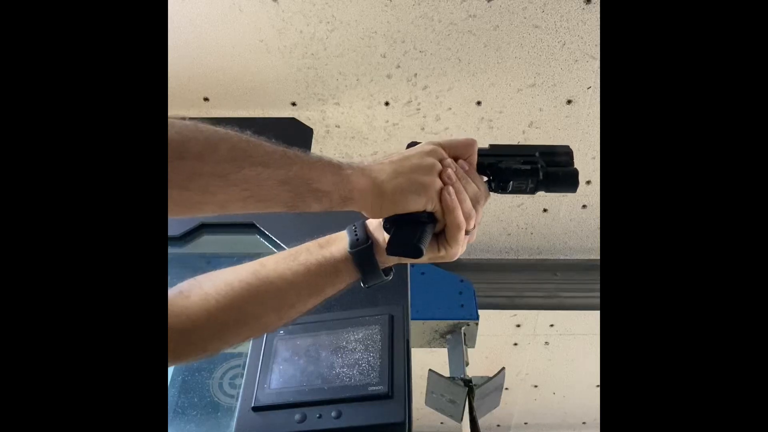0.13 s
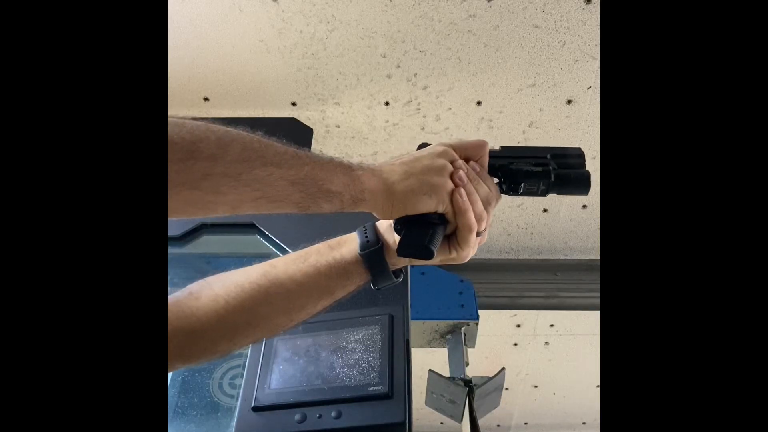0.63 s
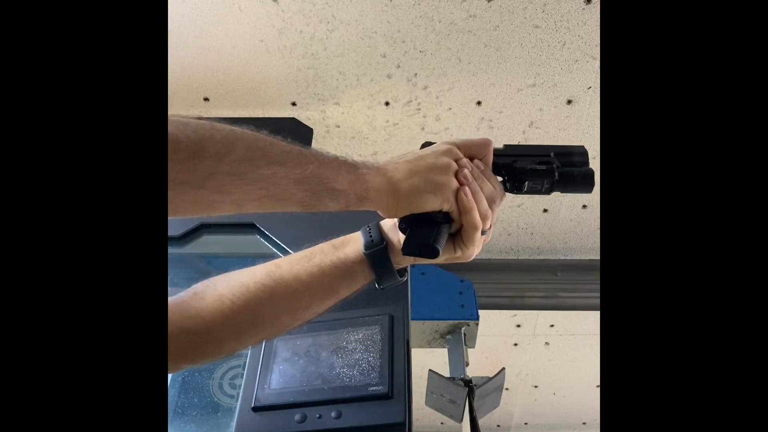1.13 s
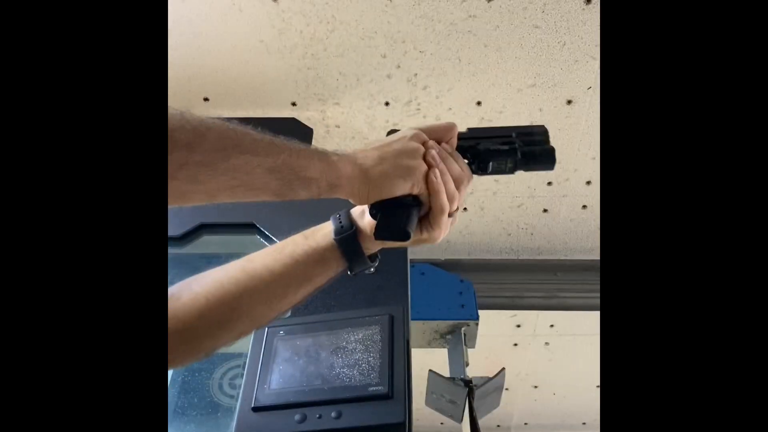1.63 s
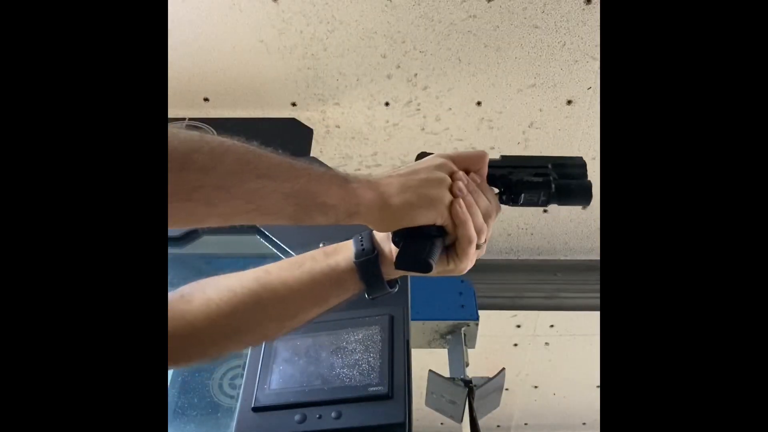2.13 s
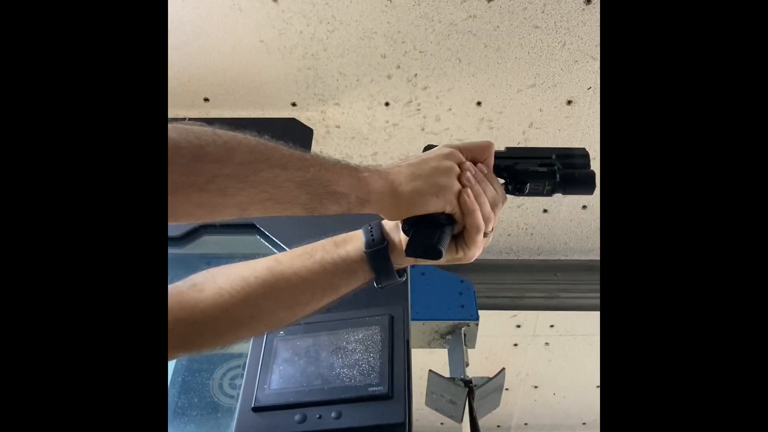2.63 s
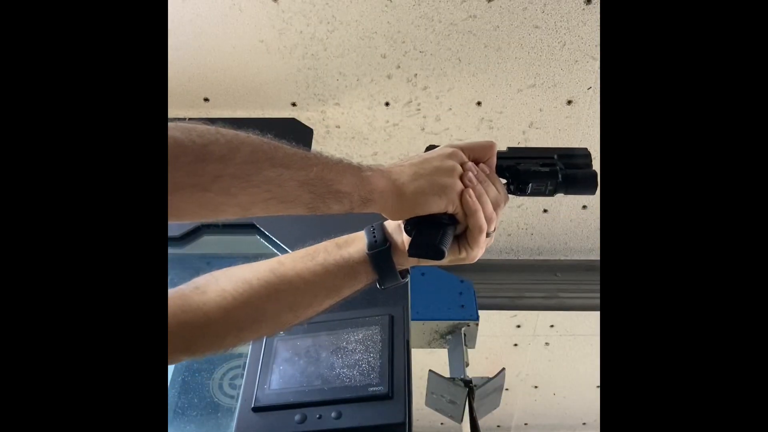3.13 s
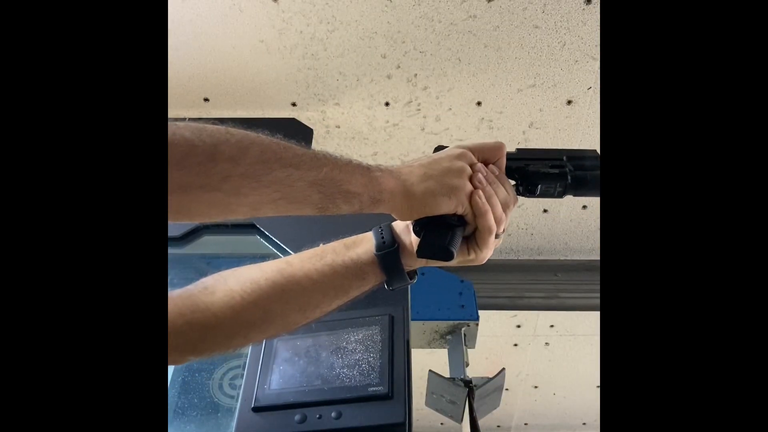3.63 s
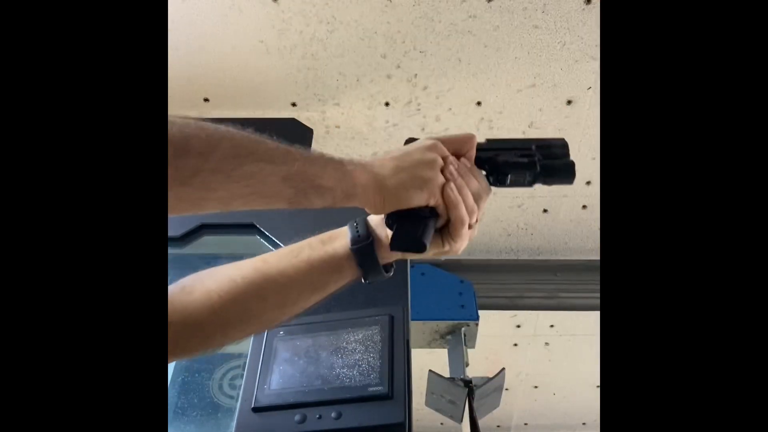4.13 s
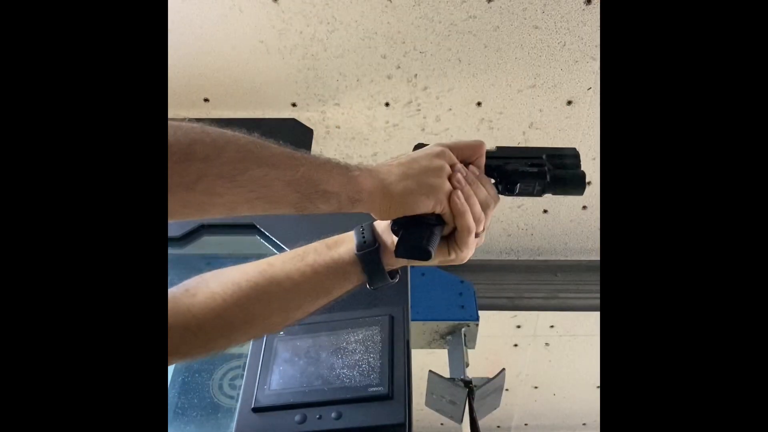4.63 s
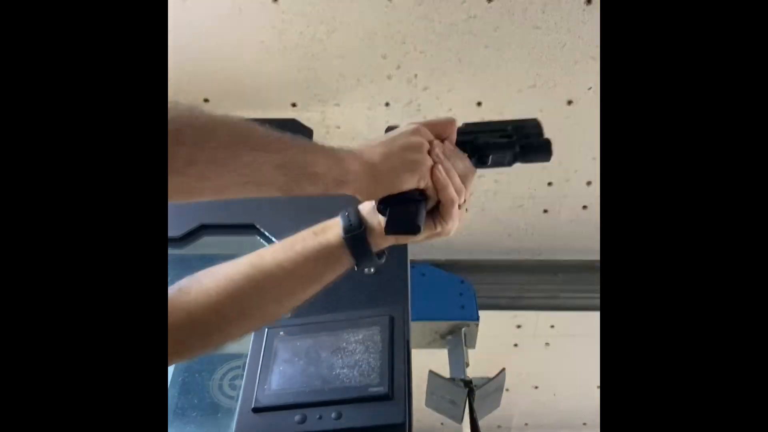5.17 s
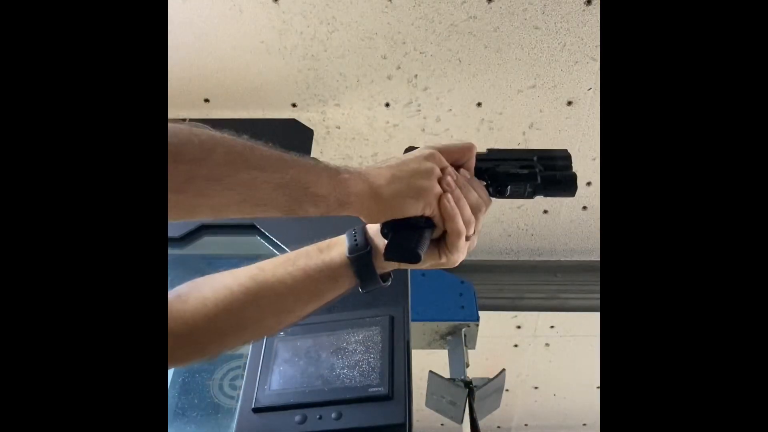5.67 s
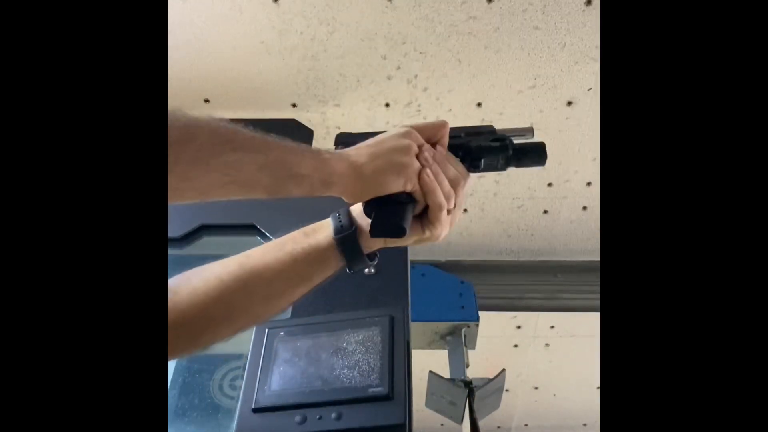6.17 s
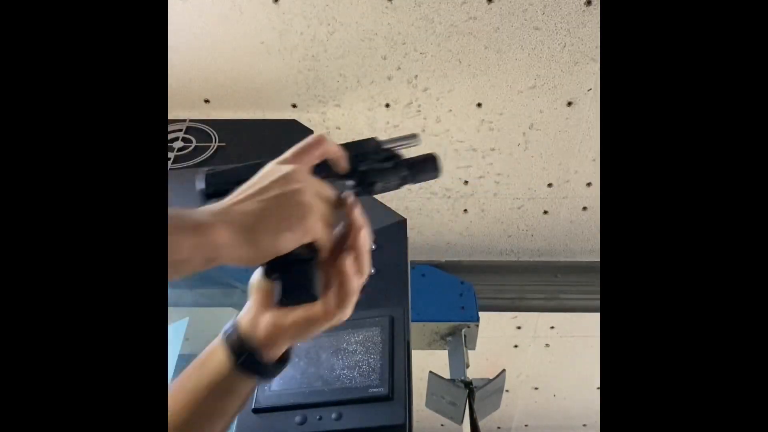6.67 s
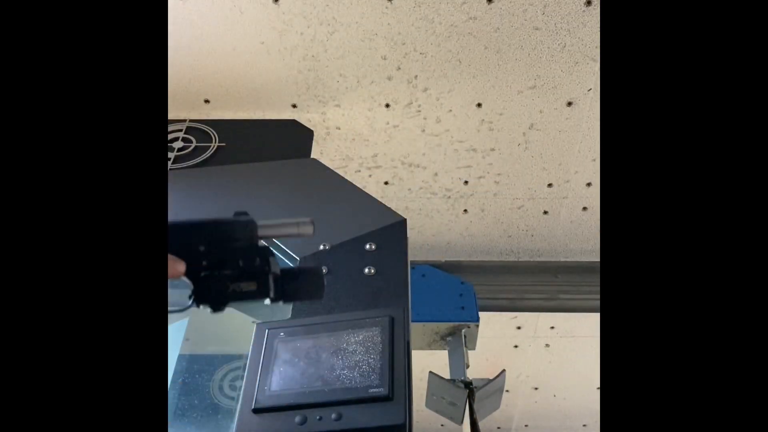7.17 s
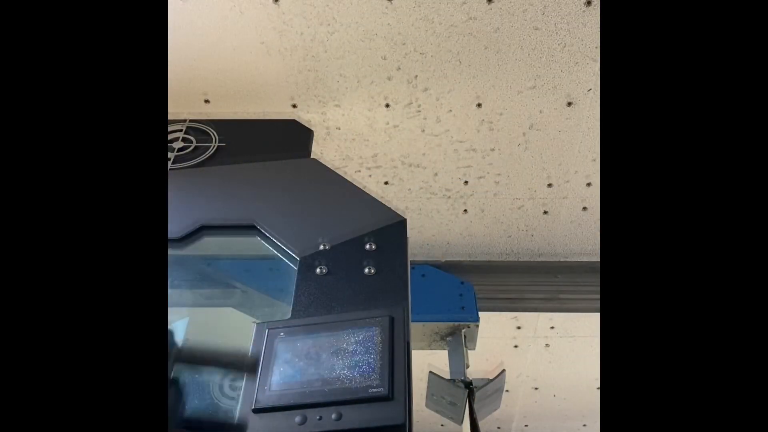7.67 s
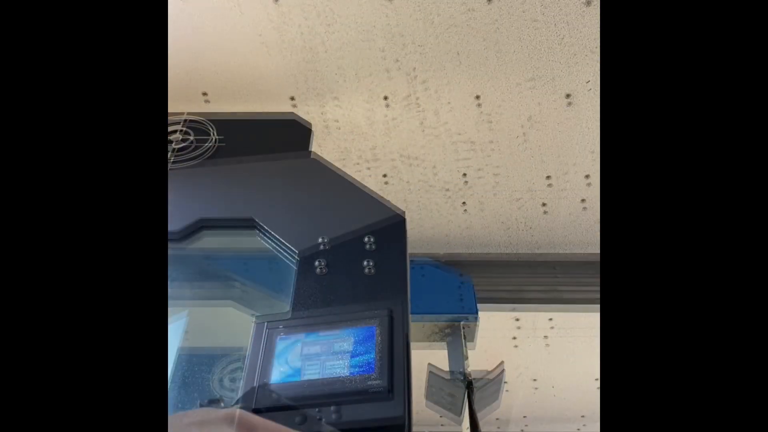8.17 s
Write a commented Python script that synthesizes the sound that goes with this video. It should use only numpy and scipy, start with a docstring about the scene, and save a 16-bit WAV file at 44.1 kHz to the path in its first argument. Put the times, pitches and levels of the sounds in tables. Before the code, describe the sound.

Indoor shooting range, heard close in stereo from inside a booth. Brass tinkles first over soft bass-heavy air noise. Four very loud pistol shots follow, separated by one long gap and two shorter ones, each a sharp crack with a dense booth burst, far-wall returns and a long dark tail. Cases ping between them. Dull neighbouring shots swell through the wall near the second blast and after the last, alongside gun-handling clicks.

```python
"""Ventilation rumbles while a brass case bounces on the floor; then a pistol fires four times close by.
The place is a booth of a long, hard-walled indoor range, heard through a two-port microphone.
Each blast is a short pulse with reflections; shaped noise fills the booth and returns down the hall.
A neighbour fires three times behind a wall: dull noise, a panel rattle and a late swell.
Cases and small sounds such as gun handling are noise and clicks that set metal resonances ringing."""
import sys
import numpy as np
from scipy import signal
from scipy.fft import rfft, irfft, next_fast_len
from scipy.io import wavfile
from scipy.ndimage import map_coordinates

SR = 44100
rng = np.random.default_rng(int(sys.argv[2]) if len(sys.argv) > 2 else 0)


def generate_wav(signal):
    """Clip the signal to [-1, 1] and save it as 16-bit WAV at the path in sys.argv[1]."""
    frames = np.transpose(np.atleast_2d(signal))
    scaled = np.clip(frames, -1, 1) * 32767
    pcm = np.round(scaled).astype(np.int16)
    wavfile.write(sys.argv[1], SR, pcm)


def ratio(d):
    """dB to gain"""
    e = np.asarray(d, float) / 20
    return 10 ** e


N = 365588

PORTS_DIFFER_HZ = 500   # around here the two microphone ports begin to hear different sound
# Reverberation of the long hall by pitch: f/Hz, build-up/s, t60/s
HALL_TIMES = [(49, 0.14, 2.3), (254, 0.02, 1.57), (600, 0.0092, 1.434), (1440, 0.042, 1.21),
              (2980, 0.0082, 1.16), (6000, 0.0055, 0.84), (10840, .005, 0.31)]


def at_hz(points, hz, axis=1):
    """Reads a column of a table on a log-frequency axis."""
    table = np.array(points)
    return np.interp(np.log(hz), np.log(table[:, 0]), table[:, axis])


def bands(size):
    """Third-octave bands of stereo noise, flat per Hz; the ports differ more as the wave gets shorter."""
    edges = 22 * 2 ** (np.arange(30) / 3)
    settle = 4000   # samples dropped while the filters settle
    white = rng.standard_normal((2, 2, size + settle))
    for k, (low, high) in enumerate(zip(edges, edges[1:])):
        sos = signal.butter(2, [low, high], "band", fs=SR, output="sos")
        mid, side = signal.sosfilt(sos, white[k % 2])[:, settle:]
        hz = np.sqrt(low * high)
        yield hz, mid + side * [[1], [-1]] * hz / np.hypot(hz, PORTS_DIFFER_HZ)


def level(spectrum, db):
    """dB-per-Hz table as a gain by pitch, scaled so that the whole spectrum has the given rms."""
    hz = np.arange(20., SR / 2, 5.)
    total = np.mean(ratio(at_hz(spectrum, hz)) ** 2 * (hz < spectrum[-1][0]))
    return lambda f: ratio(db + at_hz(spectrum, f)) / np.sqrt(total)


def swell(t, rise, t60):
    """Builds up from t = 0 while decaying at 60 dB per t60."""
    t = np.maximum(t, 0)
    build_up = 1 - np.exp(-np.minimum(t / max(rise, 1e-4), 40))
    return build_up * np.exp(-np.minimum(np.log(1000) * t / t60, 40))


def ring(clicks, hz, t60):
    """A damped resonance: a unit click starts a sine of height 1."""
    r, w = ratio(-60 / (t60 * SR)), 2 * np.pi * hz / SR
    return signal.lfilter([0, np.sin(w)], [1, -2 * r * np.cos(w), r * r], clicks + 1e-18)


def add(out, s, x):
    """Mixes x into out from time s on."""
    i = round(s * SR)
    out[..., i:i + x.shape[-1]] += x[..., :out.shape[-1] - i]


def ventilation():
    """Steady air noise throughout, strongest in the bass."""
    # Air noise spectrum: f/Hz, level/dB per Hz
    air_spectrum = [(13, -37), (22, -17), (38, -5.5), (70, 0.5), (103, -7), (250, -16), (600, -17),
                    (950, -19), (1300, -23), (2550, -27), (4880, -34), (9850, -45), (12500, -48.5),
                    (16000, -54.5)]
    air = level(air_spectrum, -63.5)
    return sum(air(hz) * noise for hz, noise in bands(N))


def cases():
    """Each bounce: a few ms of rough contact, a hollow knock, and the brass tube left ringing."""
    # Bounces on the floor: t/s, skid level/dB, knock f/Hz, knock level/dB, ring level/dB
    bounces = [(.002, -57.5, 3630, -54, -68), (.0628, -43.5, 3710, -27.5, -61),
               (.0854, -51.5, 3740, -38, -70), (.0942, -46.5, 3580, -34, -63), (.1221, -59, 3680, -40, -69),
               (.1374, -73, 3700, -47, -64), (.176, -54.5, 2040, -38, -70), (.2109, -59, 3570, -44.5, -74),
               (.2808, -41.5, 3630, -26.5, -65), (.3456, -61.5, 2090, -43, -81),
               (.3586, -57.5, 3670, -40.5, -75), (.4923, -61, 2300, -52, -83),
               (.5412, -69.5, 1970, -57, -87), (1.9114, -49, 3700, -70, -64.5),
               (2.1644, -58, 4520, -63.5, -85.5), (2.5336, -61.5, 4400, -53, -76.5),
               (2.8669, -71.5, 4150, -59, -78), (4.3899, -35.5, 3630, -26, -50.5),
               (4.4274, -49.5, 3720, -56, -66), (4.8843, -77, 2780, -51, -77),
               (5.6854, -44.5, 3760, -50, -72), (5.7034, -28.5, 2530, -34, -63),
               (7.3794, -72, 3750, -66, -67.5), (7.5894, -70, 3700, -70, -69.5)]
    # Partials of the knock: share of the knock's f, level/dB, t60/s
    knock = [(.35, -25, .015), (.6, -20, .008), (.82, -14, .022), (.97, -6, .01), (1., 0, .02),
             (1.13, -9, .008), (1.3, -12, .01)]
    # Ringing of the bouncing case: f/Hz, level/dB, t60/s
    brass_ring = [(7885, 0, .38), (7930, -3, .3), (9400, -16, .1), (12220, -9, .25)]
    skid_t60_s, skid_brightness = 0.035, 0.51   # brightness: 0 = full-bodied, 1 = treble only
    grit_share, grit_t60_s = 0.5, 0.03   # push of the rough contact beside the firm one
    left_db = 3.5   # tilt towards the left port
    out, t = np.zeros((2, N)), np.arange(SR // 2) / SR
    tilt = ratio(np.array([[left_db], [-left_db]]) / 2)
    grit = rng.standard_normal((len(bounces), 2, SR // 10))
    for (s, skid_db, hz, db, ring_db), noise in zip(bounces, grit):
        padded = np.pad(noise, ((0, 0), (0, len(t) - SR // 10)))
        skid = padded * swell(t, 0.00088, skid_t60_s)
        rough = skid * swell(t, .002, grit_t60_s)
        # one firm contact amid the grit
        push = signal.unit_impulse(len(t), 60) + grit_share * rough / np.sqrt(np.sum(rough ** 2) / 2)
        bounce = ratio(skid_db) * signal.lfilter([1, -skid_brightness], 1, skid)
        for k, (share, d, t60) in enumerate(knock):
            bounce += (-1) ** k * ratio(db + d) * ring(push, share * hz, t60)
        for f, d, t60 in brass_ring:
            bounce += ratio(ring_db + d) * ring(push, f, t60)
        add(out, s, bounce * tilt)
    return out


def small_sounds():
    """Short noise bursts around a broad resonance, each of which sets steel resonances ringing."""
    # Gun handling, dull bodies of case knocks, a low blip, the onset of a neighbour's shot:
    # t/s, level/dB, centre f/Hz, t60/s
    bursts = [(.179, -44, 600, 0.081), (0.213, -51.5, 600, 0.25), (0.62, -44.5, 9000, 0.027),
              (2.882, -48.5, 650, 0.061), (3.590, -48, 7980, 0.047), (6.645, -59, 6000, 0.18),
              (6.648, -43, 1800, 0.08), (6.912, -49.5, 3550, 0.11), (7.014, -49, 8000, 0.074),
              (7.034, -50.5, 5060, 0.168), (7.101, -49, 2700, 0.06), (7.139, -59, 3800, 0.1),
              (3.439, -57, 390, 0.43)]
    # Steel resonances: f/Hz, level/dB, t60/s
    steel = [(1940, 2, .05), (2700, -2.5, 0.037), (3770, -3, 0.058), (5060, 3, .08), (5260, -8, .08),
             (10300, -8, .05)]
    steel_db, rise_s = 9, 0.0017   # steel_db is added to every resonance
    out, t = np.zeros((2, N)), np.arange(SR // 5) / SR
    noises = rng.standard_normal((len(bursts), 2, len(t)))
    for (s, db, hz, t60), noise in zip(bursts, noises):
        sos = signal.butter(2, [hz / 2.4, min(hz * 1.51, .45 * SR)], "band", fs=SR, output="sos")
        # the root evens out the loudness of narrow and wide bands
        burst = signal.sosfilt(sos, noise) * swell(t, rise_s, t60) * np.sqrt(SR / 4 / hz)
        ringing = 0
        for f, d, ring_t60 in steel:
            per_sample = 2 * np.log(1000) / (ring_t60 * SR)   # offsets the gain of a long ring
            ringing = ringing + ratio(steel_db + d) * per_sample * ring(burst, f, ring_t60)
        add(out, s, ratio(db) * (burst + ringing))
    return out


def blast(ms):
    """Pressure pulse: two strong opposite swings, with a faint one at each end; ms is one full wave."""
    phase = np.linspace(0, 1, int(1.5 * ms * SR / 1000))
    return np.sin(3 * np.pi * phase + np.pi / 2) * np.sin(np.pi * phase) ** 2


def direct_sound(t):
    """The muzzle blast, its strong dull reflections in opposite polarity, and the slide cycling."""
    # Reflections between the side walls and off the end wall: delay/s, level/dB, wave length/ms
    slaps = [(.012, -20.5, 3.1), (.027, -19.5, 3.), (.040, -9, 2.1), (0.061, -12, 2.7), (.095, -16, 3.),
             (0.164, -13.5, 3.4)]
    # The slide cycles after each shot: delay/s, f/Hz, level/dB, t60/s
    slide = [(.008, 6110, -16.5, 0.027), (.016, 3722, -17, .05)]
    direct = np.zeros(len(t))
    add(direct, 0, -ratio(-9.5) * blast(1.2))
    for delay, db, ms in slaps:
        add(direct, delay, ratio(db) * blast(ms))
    for delay, hz, db, t60 in slide:
        add(direct, delay, ratio(db) * swell(t, 0.0015, t60) * np.sin(2 * np.pi * hz * t))
    return direct


def booth_modes(t):
    """Each resonance reaches the two ports with its own phase, further apart at high pitch."""
    # Resonances between the booth partitions: f/Hz, level/dB, t60/s
    partitions = [(219.7, -22, 0.69), (275, -24, 0.91), (362, -19, 0.54), (442, -19.5, 0.73),
                  (469.5, -22, .45), (544, -21.5, 0.75), (732, -26, .4), (1049, -25, .4),
                  (1026, -28.5, 0.48), (1104, -26.5, 0.75), (1310, -29.5, 0.46), (1280, -33.5, .4),
                  (1714, -27.5, 0.5), (2700, -35, 0.41)]
    rise_s, out = 0.02, 0
    apart = rng.uniform(-np.pi, np.pi, (len(partitions), 2, 1))
    for (hz, db, t60), phase in zip(partitions, apart):
        port_phase = phase * hz / np.hypot(hz, PORTS_DIFFER_HZ)
        out = out + ratio(db) * swell(t, rise_s, t60) * np.sin(2 * np.pi * hz * t + port_phase)
    return out


def booth_envelope(t, hz):
    """Sound caught close by in the booth; the first reflections are extra bright."""
    # Spectrum of the booth: f/Hz, level/dB per Hz
    booth_spectrum = [(18, -46.5), (35, -16.5), (70, -9), (150, -9.5), (230, 3), (453, -0.5), (700, -7.5),
                      (850, -11), (1100, -8.5), (3300, -22), (6000, -22.5), (10000, -26.5), (12000, -34),
                      (16400, -30.5)]
    # Reverberation of the booth by pitch: f/Hz, build-up/s, t60/s
    booth_times = [(50, 0.016, 0.94), (245, 0.036, .35), (600, 0.027, 0.46), (1560, 0.00082, 0.33),
                   (4000, .0015, 0.4), (9000, .001, 0.26)]
    crack_db, crack_t60_s, crack_hz = 1, .1, 1200   # boost at the onset, towards the treble
    near = level(booth_spectrum, -7)(hz)
    near = near * swell(t, at_hz(booth_times, hz), at_hz(booth_times, hz, axis=2))
    boost = (ratio(crack_db) - 1) * ratio(-60 * t / crack_t60_s)
    return near * (1 + boost * hz / np.hypot(hz, crack_hz))


def hall_envelope(t, hz):
    """Sound coming back from down the hall: a long decay, two far-wall returns, and a lingering tail."""
    # Spectrum coming back from the hall: f/Hz, level/dB per Hz
    hall_spectrum = [(18, -38.5), (30, -36), (64, -6.5), (130, -5), (282, -1), (450, -1), (748, -5.5),
                     (1270, -5.5), (2500, -14.5), (4500, -22.5), (7000, -26.5), (10000, -38), (16400, -52)]
    round_trip_s = 0.16
    shoulder_s = 0.046   # sound keeps streaming back along the hall before the decay sets in
    end_wall_db, trip_loss_db, end_wall_rise_s, end_wall_t60_s = -2.5, -2, 0.0039, 0.21
    linger_db, linger_stretch = -18, 2.21   # a weaker, slower tail from coupled spaces
    rise, t60 = at_hz(HALL_TIMES, hz), at_hz(HALL_TIMES, hz, axis=2)
    back = np.maximum(t - round_trip_s, 0)
    far = (1 - np.exp(-back / rise)) * ratio(-60 * (np.hypot(back, shoulder_s) - shoulder_s) / t60)
    returns = 0
    for k in range(2):
        since = t - (k + 1) * round_trip_s
        returns = returns + ratio(end_wall_db + k * trip_loss_db) * swell(since, end_wall_rise_s, end_wall_t60_s)
    late = ratio(linger_db) * swell(t - round_trip_s, rise, linger_stretch * t60)
    return level(hall_spectrum, -25)(hz) * np.sqrt(far ** 2 + returns ** 2 + late ** 2)


def lumps(t):
    """Reflections arrive in clusters: a smooth curve through random values of spread 1, 40 a second."""
    knots = rng.standard_normal(400)
    return map_coordinates(knots, [40 * t], order=2, mode="wrap")


def standing_waves(t):
    """The lowest hall resonances beat against each other."""
    # Low resonances of the hall: f/Hz, level/dB, build-up/s, t60/s
    hall_modes = [(72.1, -16, 0.21, 1), (91.2, -24.5, 0.19, 0.58), (103.8, -25, 0.0077, 1)]
    return sum(ratio(db) * swell(t, rise, t60) * np.sin(2 * np.pi * hz * t)
               for hz, db, rise, t60 in hall_modes)


def shots():
    """Every shot excites the same room, so most of the reverberation repeats; the rest is new each time."""
    # The four close shots: t/s, strength/dB, standing-wave level/dB
    fired = [(1.1874, 1, -1), (3.7984, 1, -3), (5.0325, 1.5, -0.5), (5.9099, 1, 1)]
    sameness = 0.99   # share of the reverberation's power that repeats, 0-1
    lumps_db = 2.0   # depth of the clusters, partly shared by all bands
    size = int(2.6 * SR)
    t, out = np.arange(size) / SR, np.zeros((2, N))
    coarse = t[::8]   # slower grid for the envelopes
    shared = lumps(coarse)
    for hz, noise in bands(2 * size + len(fired) * SR // 2):
        envelope = np.hypot(booth_envelope(coarse, hz), hall_envelope(coarse, hz))
        clusters = ratio(lumps_db * (0.8 * shared + 0.49 * lumps(coarse)))
        shape = np.interp(t, coarse, envelope * clusters)
        same = noise[:, :size]
        for k, (s, db, _) in enumerate(fired):
            own = noise[:, size + k * SR // 2:][:, :size]
            mixed = np.sqrt(sameness) * same + np.sqrt(1 - sameness) * own
            add(out, s, ratio(db) * shape * mixed)
    direct = direct_sound(t) + np.zeros((2, 1))
    add(direct, 0, booth_modes(t[:SR]))
    waves = standing_waves(t)
    for s, db, waves_db in fired:
        add(out, s, ratio(db) * (direct + ratio(waves_db) * waves))
    return out


def rolling():
    """A case rolls over the floor: tiny uneven ticks keep the brass ringing high."""
    # Loudness of the roll: t/s, level/dB
    roll = [(1.98, -100), (2.13, -78), (2.17, -58), (2.22, -83), (2.6, -77), (2.65, -64.5), (2.75, -82),
            (3.0, -74), (3.15, -85)]
    # Ringing of the rolling case: f/Hz, level/dB, t60/s
    brass_ring = [(11960, 0, .6), (12000, -6, .4), (10900, -17, .6)]
    ticks_per_s, spread_db = 110, 3.5
    s, db = np.transpose(roll)
    out, t = np.zeros((2, N)), s[0] + np.arange(2 * SR) / SR
    struck = rng.random((2, len(t))) < ticks_per_s / SR
    ticks = struck * ratio(spread_db * rng.standard_normal((2, len(t))))
    ticks = ticks * ratio(np.interp(t, s, db)) * (t < s[-1])
    add(out, s[0], sum(ratio(d) * ring(ticks, f, t60) for f, d, t60 in brass_ring))
    return out


def neighbour():
    """A muffled thud first, then the reverberation that came round the wall swells up."""
    # The neighbour's three shots: t/s, strength/dB, standing-wave level/dB
    fired = [(3.744, -1.5, -43.5), (6.638, -15.5, -20), (7.300, -2, -26)]
    # Thud through the wall: f/Hz, level/dB per Hz
    wall_spectrum = [(18, -43.5), (40, 3), (70, 3), (161, -5), (473, 5), (800, -5.5), (1300, -15.5),
                     (2600, -21.5), (7840, -34), (16000, -63.5)]
    # A panel rattles at the thud: f/Hz, level/dB per Hz
    panel_spectrum = [(300, -9), (500, 5.5), (1200, -6), (1900, -0.5), (2300, 1.5), (2800, -8), (8000, -24),
                      (16000, -46.5)]
    # Resonances of that panel: f/Hz, level/dB, t60/s
    panel_modes = [(520, -47, 0.25), (1890, -41, 0.1), (2750, -60.5, 0.073)]
    # The same shot arriving the long way round: f/Hz, level/dB per Hz
    detour_spectrum = [(18, -45), (30, -41), (74, -5.5), (135, -11.5), (294, -4.5), (700, -6),
                       (1460, -12.5), (3000, -22.5), (6570, -31.5), (16000, -46.5)]
    panel_t60_s = 0.4
    detour_s, detour_rise_s, detour_stretch = 0.23, 0.19, 1.454   # stretch multiplies the hall's t60
    t, heard, out = np.arange(SR) / SR, 0, np.zeros((2, N))
    wall, panel = level(wall_spectrum, -42), level(panel_spectrum, -45.5)
    detour = level(detour_spectrum, -32)
    for hz, noise in bands(SR):
        t60 = at_hz(HALL_TIMES, hz, axis=2)
        through_wall = wall(hz) * swell(t, 0.0068, t60)
        rattle = panel(hz) * swell(t - .008, 0.02, panel_t60_s)
        around = detour(hz) * swell(t - detour_s, detour_rise_s, detour_stretch * t60)
        heard = heard + noise * np.hypot(np.hypot(through_wall, rattle), around)
    for hz, db, t60 in panel_modes:
        heard = heard + ratio(db) * swell(t - .012, 0.012, t60) * np.sin(2 * np.pi * hz * t)
    for s, db, waves_db in fired:
        add(out, s, ratio(db) * heard + ratio(waves_db) * standing_waves(t))
    return out


def scene():
    """All sources, raised half a dB on the left and lowered as much on the right."""
    mix = ventilation() + cases() + small_sounds() + shots() + rolling() + neighbour()
    return mix * ratio([[0.5], [-0.5]])


def top_cut(x):
    """Nothing passes above the cut-off."""
    return signal.sosfilt(signal.butter(12, 16510, fs=SR, output="sos"), x)


def record(dry):
    """Sum and difference of left and right each get their tone; peaks are rounded off below full scale."""
    # Tone of the sum as stored, with thinned treble: f/Hz, level/dB
    sum_tone = [(900, 0.5), (1650, 0), (1950, -4.5), (2250, 0.5), (2700, 1.5), (3200, 1), (4550, 0),
                (4950, -5), (5400, -0.5), (8000, -1.5), (10000, -3), (11500, -8.5), (13000, -14),
                (16500, -18)]
    # Tone of the difference between the two microphone ports: f/Hz, level/dB
    difference_tone = [(60, 0), (150, -9), (230, -5.5), (330, -5), (600, 1), (1200, 0), (1900, -10),
                       (2700, 3), (4200, 1), (5500, -0.5), (6400, -7.5), (10000, 3.5), (14000, -3),
                       (16500, -2.5)]
    hardness = 4.7   # higher = peaks stay straight for longer, then bend sharply
    left, right = dry
    size = next_fast_len(N + 4096)
    hz = np.maximum(np.arange(size // 2 + 1) * SR / size, 1)
    mid = irfft(rfft(left + right, size) * ratio(at_hz(sum_tone, hz)), size)[:N] / 2
    side = irfft(rfft(left - right, size) * ratio(at_hz(difference_tone, hz)), size)[:N] / 2
    x = np.array([mid + side, mid - side])
    rounded = x / (1 + np.abs(x) ** hardness) ** (1 / hardness)
    return top_cut(rounded)


dry = scene()
out = record(dry)
generate_wav(out)
```